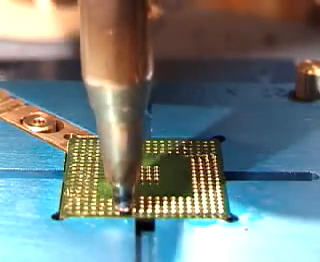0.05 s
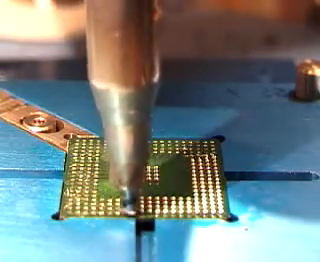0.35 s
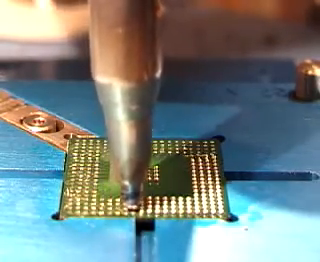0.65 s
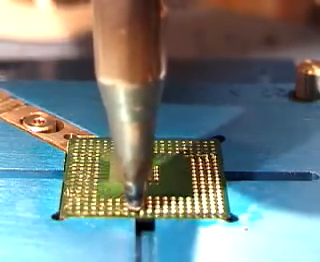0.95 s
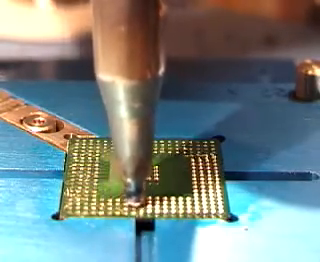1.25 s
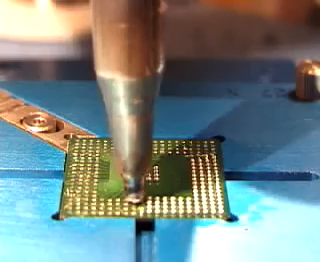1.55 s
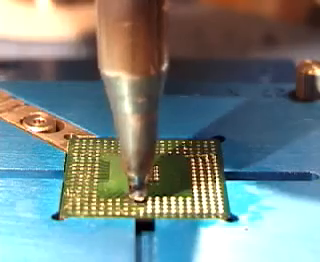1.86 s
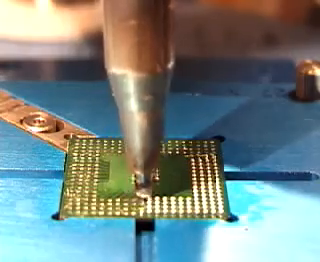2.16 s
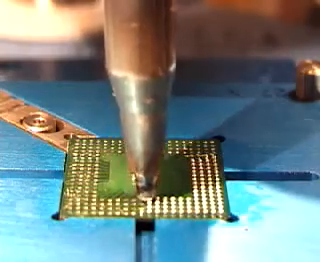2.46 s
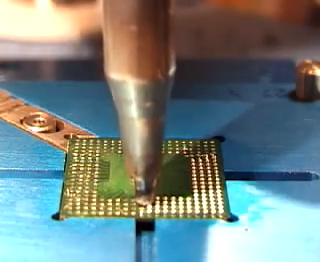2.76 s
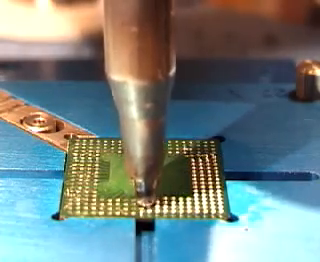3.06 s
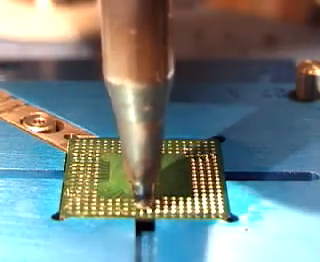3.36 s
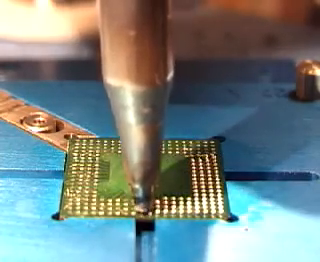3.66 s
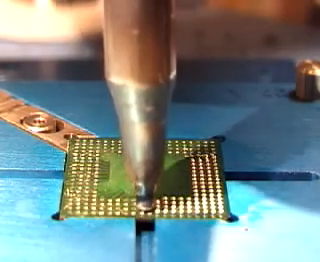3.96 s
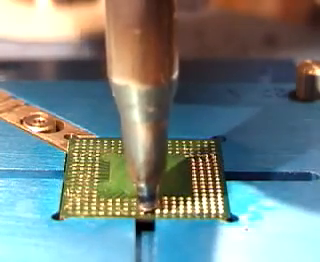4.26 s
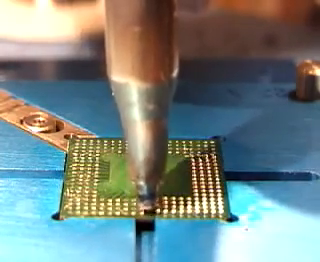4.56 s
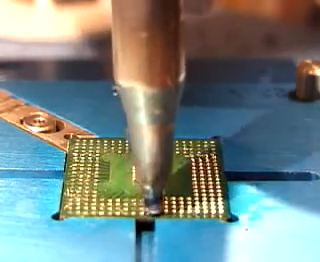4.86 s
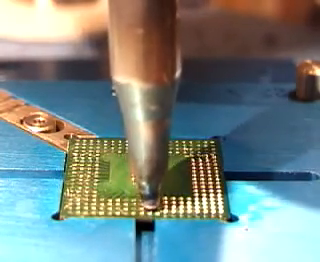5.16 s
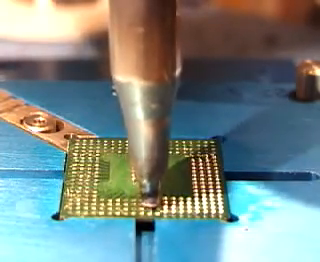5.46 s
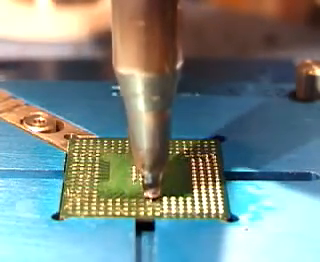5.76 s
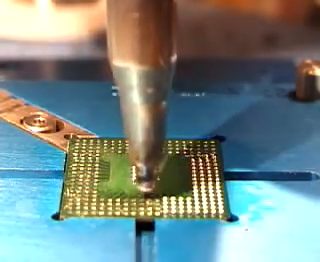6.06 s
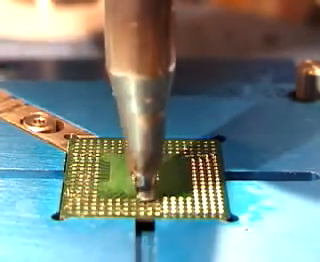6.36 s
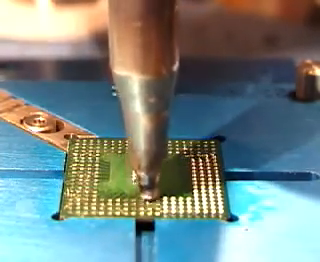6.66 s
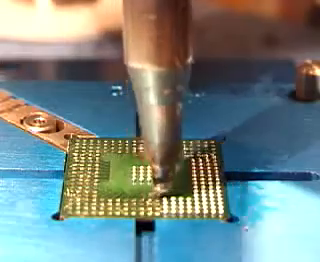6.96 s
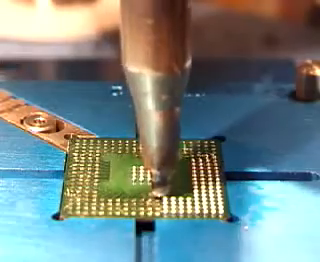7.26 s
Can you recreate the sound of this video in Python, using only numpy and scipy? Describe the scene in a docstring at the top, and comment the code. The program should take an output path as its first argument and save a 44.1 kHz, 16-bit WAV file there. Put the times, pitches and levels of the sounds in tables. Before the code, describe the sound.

Close by on a workbench, a desoldering gun works on a circuit board over the constant buzzing hum of its vacuum pump. A short hiss opens, then a few light ticks and a soft thud from the holder. More ticks and sputtering sips of air follow at uneven intervals as the nozzle lifts and reseals. The hum repeatedly takes on a stronger ringing tone later on, and a longer hiss comes at the end.

```python
"""Desoldering gun and vacuum pump

A mains motor drives a diaphragm 56 times a second. Its two strokes a turn force a harmonic hum from
the housing, while the valves rattle and puff. Whenever the nozzle lifts off the solder, turbulent air
hisses and fizzes in and the hum changes colour. The tip ticks on solder beads; the holder bumps once."""
import sys
import numpy as np
from scipy import signal
from scipy.fft import rfft, irfft, next_fast_len
from scipy.io import wavfile
from scipy.ndimage import map_coordinates

SR = 44100
rng = np.random.default_rng(int(sys.argv[2]) if len(sys.argv) > 2 else 0)


def wav_record(signal):
    """Record a signal, one row per channel, as 16-bit PCM in the file named by sys.argv[1]."""
    frames = np.transpose(np.atleast_2d(signal))
    bounded = np.clip(frames, -1, 1)
    # unit amplitude maps onto the largest positive 16-bit level
    quanta = np.round(bounded * 32767).astype(np.int16)
    wavfile.write(sys.argv[1], SR, quanta)


N = 327222

# Motor speed, sagging as the vacuum deepens. Each row: time in seconds, turns per second.
SPEED = [(0.0, 56.179), (2.6, 56.204), (3.05, 55.973), (3.5, 56.138), (4.4, 56.095), (4.75, 55.846),
         (5.5, 56.164), (5.95, 55.83), (6.2, 56.033), (6.6, 55.876), (6.9, 56.049), (7.42, 55.94)]
# Modes of the pump casing. Each row: frequency in Hz, bandwidth in Hz, gain in dB.
CASING_MODES = [(1458, 19, 1), (1857.3, 38, -0.5), (2019, 26, 3.5), (2574, 43, -6.5), (2945, 35, -1),
                (3870, 166, 0)]
# Modes of the nozzle tube. Each row: frequency in Hz, bandwidth in Hz, gain in dB.
TUBE_MODES = [(5560, 230, -3), (6830, 910, -2.5), (8040, 470, -4), (8800, 430, -4), (10070, 340, -4)]
SEALED_DB = -32  # relative airflow level with the nozzle on the solder


def hum(turns, beat, vented, scatter_hz=2050, waver_db=2.0, hose_orders=(8, 16)):
    """Periodic forcing: opposed strokes about half a turn apart excite harmonics of the shaft speed."""
    # Each row, from the first harmonic up: relative level in dB with the nozzle sealed, then open.
    harmonics = [(-43.5, -43.5), (-37.5, -39), (-26, -27), (-18.5, -19), (-21.5, -22), (-23, -23),
                 (-31.5, -33.5), (-32, -32), (-35, -34), (-37.5, -36), (-35, -39.5), (-27, -28.5),
                 (-33.5, -40), (-33.5, -39), (-37, -36.5), (-44.5, -47), (-31, -32), (-43.5, -48.5),
                 (-39.5, -38), (-39, -48), (-46, -48), (-42.5, -35.5), (-41.5, -39.5), (-43, -40),
                 (-39.5, -34.5), (-35.5, -44), (-58, -41), (-43, -43), (-50, -38), (-36, -60),
                 (-40.5, -33.5), (-34, -31.5), (-29.5, -29), (-35.5, -54), (-43, -46), (-35, -40),
                 (-57, -47), (-47, -47), (-49, -51), (-46, -42), (-48, -47), (-47, -44.5), (-45, -45),
                 (-40, -41), (-44.5, -41), (-37, -54), (-62, -38.5), (-41, -51)]
    # Dull intake against hard exhaust. Each row: frequency in Hz, intake over exhaust in dB.
    stroke_balance = [(335, 1), (480, 8), (800, 5), (1100, -1.5), (1800, -9.5)]
    # Air modes of the pump chamber. Each row: frequency in Hz, bandwidth in Hz, gain in dB.
    chamber_modes = [(311, 66, 0), (673, 26, 1), (953, 20, -2)]
    # Timbre under load. Each row: frequency in Hz, change in dB per turn a second lost.
    strain = [(60, 3), (225, -3.5), (340, -3), (560, -5), (670, -2.5), (740, 16), (850, -2), (950, -0.5),
              (1850, -2)]
    # Modulation by the slip beat. Each row: frequency in Hz, depth in dB.
    throb = [(170, 0.4), (225, 0.62), (280, 0.26), (337, 2.1), (450, 0.5), (670, 0.87), (950, -0.03),
             (1850, 0.3)]
    hose_db = hose(vented)
    speed = curve(SPEED)
    slowing = speed.mean() - speed
    out = np.zeros(N)
    for k, (sealed_db, open_db) in enumerate(harmonics, 1):
        hz = k * speed.mean()
        intake = amp(along(stroke_balance, hz)) * np.exp(-2j * np.pi * k * .186)
        strokes = intake - np.exp(-2j * np.pi * k * .659)
        casing = ringing(hz, CASING_MODES)
        body = ringing(hz, chamber_modes) + casing
        # Short waves arrive by many paths: their phase scatters, except where the casing rings.
        diffuse = min(hz / scatter_hz, 1) ** 2
        scatter = diffuse * max(1 - 2 * abs(casing), 0)
        phase = np.angle(strokes * body) + 1.15 * scatter * rng.standard_normal()
        phase += 0.34 * diffuse * wobble(25)
        db = sealed_db + vented * (open_db - sealed_db) + along(strain, hz) * slowing
        db += along(throb, hz) * beat + waver_db * diffuse * wobble(7)
        if k in hose_orders:
            db += hose_db
        out += amp(db) * np.sqrt(2) * np.cos(2 * np.pi * k * turns + phase)
    return out


def motor(mains_hz=60, start_turn=.12):
    """Induction slip: the rotor lags the mains, and torque beats at twice the difference frequency."""
    turns = start_turn + np.cumsum(curve(SPEED)) / SR
    beat = np.cos(4 * np.pi * (mains_hz * np.arange(N) / SR - turns) + 1.4)
    surge = 0.12 * beat + .05 * wobble(30)  # turns per second
    return turns + np.cumsum(surge) / SR, beat


def hose(vented, rest_db=-3.5, vented_db=-2):
    """Duct resonance: the hose's gain in dB swells as the vacuum shifts; an open nozzle damps it."""
    # Each row: start in seconds, length in seconds, gain in dB.
    swells = [(2.9, .65, 8.5), (4.0, 0.81, 10.5), (4.82, 0.34, 7.5), (5.42, 0.66, 8), (6.1, 0.48, 6.5),
              (6.62, 0.41, 8.5), (7.18, .45, 5)]
    t = np.arange(N) / SR
    arches = sum(db * np.sin(np.pi * np.clip((t - start) / length, 0, 1)) for start, length, db in swells)
    return rest_db + arches + vented_db * vented


def exhaust(turns, puff_db=2.5, sharpness=14):
    """Pulsating jet: air leaves the valve in one puff a turn over a continuous rush."""
    # Each row: frequency in Hz, relative spectral density in dB.
    spectrum = [(30, -17), (90, -9.5), (320, -2), (500, 0), (700, -1), (1150, -5.5), (1800, -3),
                (2700, -4.5), (3400, -7), (4200, -9.5), (5800, -15.5), (11000, -17), (11800, -12),
                (15000, -20.5)]
    puff = np.abs(np.cos(np.pi * (turns - .48))) ** sharpness
    return turbulence(spectrum, amp(puff_db * puff + 0.87 * wobble(25) + wobble(500)))


def rattle(turns, scatter_db=1.5, jitter_s=.0012):
    """Modal excitation: one uneven slap of the valve flap a turn, and rushing air, ring the casing."""
    slaps = np.flatnonzero(np.diff(np.floor(turns - .42)))
    lateness, size = rng.standard_normal((len(slaps), 2)).T
    onsets = np.clip(slaps + (jitter_s * lateness * SR).astype(int), 0, N - 1)
    blows = np.zeros(N)
    blows[onsets] = amp(scatter_db * size)
    drive = unit(blows) + rng.standard_normal(N)
    return unit(filtered(drive, lambda f: ringing(f, CASING_MODES)))


def suction(attack_s=0.031, release_s=0.018, slope_db_per_s=-0.5):
    """Leakage flow, in dB: air rushes in as the nozzle lifts, eases slightly and stops as it reseals."""
    # Each row: start in seconds, length in seconds, relative level in dB.
    leaks = [(-.05, 0.32, -28.5), (.725, 0.036, -24.5), (.825, 0.03, -28.5), (2.137, 0.14, -25.5),
             (2.35, .08, -30.5), (4.12, .04, -27), (4.258, 0.18, -27), (4.44, .28, -26),
             (5.587, 0.023, -29), (5.695, 0.54, -28), (6.8, .65, -27.5), (7.03, .14, -25)]
    t = np.arange(N) / SR
    rise_db = np.zeros(N)
    for start, length, db in leaks:
        age = t - start
        gate = np.clip(age / attack_s, 0, 1) * np.clip(1 - (age - length) / release_s, 0, 1)
        hold_db = db - SEALED_DB + slope_db_per_s * (age - length / 2)
        rise_db = np.maximum(rise_db, gate * hold_db)
    return SEALED_DB + rise_db


def venting(air_db, threshold_db=-30, lag_s=0.035):
    """Pressure relaxation: a first-order lag between nozzle sealed (0) and open (1)."""
    is_open = (air_db > threshold_db).astype(float)
    pole = np.exp(-1 / (lag_s * SR))
    return is_open[0] + signal.lfilter([1 - pole], [1, -pole], is_open - is_open[0])


def nozzle(turns, air_db, silent_db=-33, sputter_db=2.5, pulse_db=-1.5):
    """Flow noise: air drawn past the tip hisses, pulsing with the pump and sputtering on the solder."""
    # Each row: frequency in Hz, relative spectral density in dB.
    spectrum = [(400, -6), (2200, -0.5), (3300, -6), (5400, -3.5), (9500, -5), (11000, -3.5), (11900, 2.5),
                (14500, -3), (15800, -10)]
    flow = np.sqrt(np.maximum(amp(air_db) ** 2 - amp(silent_db) ** 2, 0))
    flutter_db = sputter_db * wobble(350) + pulse_db * np.cos(2 * np.pi * turns)
    return flow * turbulence(spectrum, amp(flutter_db))


def fizz(air_db, sputter_db=3.6, flicker_db=3.0, growth=0.79):
    """Intermittent flow: air bubbles past molten solder in spurts that grow with the suction."""
    # Each row: frequency in Hz, relative spectral density in dB.
    spectrum = [(8000, -36), (11000, -17), (11700, 2), (13500, -2), (15000, -4), (15900, -13)]
    level_db = SEALED_DB + growth * (air_db - SEALED_DB)
    flutter_db = sputter_db * wobble(400) + flicker_db * wobble(90)
    return amp(level_db) * turbulence(spectrum, amp(flutter_db))


def ticks(t60_s=0.012, relative_width=0.94, knock_db=0.5, board_hz=990, tube_db=-6):
    """Impact noise: the tip cracks against a solder bead, knocks the board and rings the nozzle tube."""
    # Each row: start in seconds, relative peak level in dB, centre frequency in Hz.
    contacts = [(.7415, -11, 5500), (0.7542, -9.5, 2800), (.76, -15, 1500), (.841, -17, 8000),
                (2.162, -11.5, 5400), (2.289, -8, 13000), (4.125, -15, 5000), (4.303, -8.5, 2600),
                (4.317, -10, 4200), (4.4455, -5, 4000), (4.451, -12, 5400), (4.482, -13, 2200),
                (4.494, -12, 2800), (5.601, -10.5, 2900), (5.604, -4.5, 2200), (5.7385, -17, 5500),
                (5.741, -6.5, 2200), (5.752, -8, 2900), (5.786, -13, 2400)]
    t = np.arange(SR // 20) / SR
    f = np.fft.rfftfreq(len(t), 1 / SR)
    knock = amp(knock_db) * resonance(f, board_hz, board_hz) ** 2
    tube = 1 + amp(tube_db) * ringing(f, TUBE_MODES)
    out = np.zeros(N + len(t))
    for start, db, hz in contacts:
        burst = rng.standard_normal(len(t)) * amp(-60 * t / t60_s)
        body = resonance(f, hz, relative_width * hz) ** 2 + knock
        crack = irfft(rfft(burst) * body * tube, len(t))
        out[round(start * SR):][:len(t)] += amp(db) * crack / np.abs(crack).max()
    return out[:N]


def bump(start_s=.787, db=-27, hz=126, t60_s=.33, attack_s=.005):
    """Damped oscillation: the holder booms briefly on the bench."""
    t = np.maximum(np.arange(N) / SR - start_s, 0)
    return amp(db - 60 * t / t60_s) * (1 - np.exp(-t / attack_s)) * np.sin(2 * np.pi * hz * t)


def turbulence(spectrum, flutter):
    """Partly coherent stereo noise of rms 1, modulated by flutter and coloured by the tube's modes."""
    # Each row: frequency in Hz, correlation of left and right.
    coherence = [(60, .7), (200, .95), (1400, .93), (3100, .82), (5000, .55), (7500, .3), (10000, .6),
                 (12000, .96)]

    def response(f):
        angle = np.arccos(np.clip(along(coherence, f), -1, 1)) / 2
        colour = amp(along(spectrum, f)) * (1 + ringing(f, TUBE_MODES))
        return colour * [np.cos(angle), np.sin(angle)]

    mid, side = filtered(flutter * rng.standard_normal((2, N)), response)
    return unit(np.array([mid + side, mid - side]))


def resonance(f, hz, width):
    """Band-pass response of a damped oscillator."""
    return 1j * f * width / (hz * hz - f * f + 1j * f * width)


def ringing(f, modes):
    """Modal superposition: a body responds as the sum of its modes."""
    return sum(amp(db) * resonance(f, hz, width) for hz, width, db in modes)


def filtered(x, response):
    """Linear filtering: the spectrum of x times a complex frequency response."""
    size = next_fast_len(N + SR // 2)
    return irfft(rfft(x, size) * response(np.fft.rfftfreq(size, 1 / SR)), size)[..., :N]


def wobble(rate):
    """A smooth random curve with rate knots a second."""
    steps = np.arange(0, N + 64, 64)
    knots = rng.standard_normal(int(N * rate / SR) + 4)
    return np.interp(np.arange(N), steps, map_coordinates(knots, [steps * rate / SR]))


def along(points, hz):
    """(Hz, value) rows interpolated on a log axis."""
    f, values = np.transpose(points)
    return np.interp(np.log(hz + 1), np.log(f + 1), values)


def curve(rows):
    """(seconds, value) rows interpolated at every sample."""
    return np.interp(np.arange(N) / SR, *np.transpose(rows))


def amp(db):
    """Decibels to gain."""
    return 10 ** (np.asarray(db) / 20)


def unit(x):
    """x scaled to rms 1."""
    return x / np.sqrt(np.mean(x ** 2) + 1e-20)


def scene():
    """Superposition: pump and gun reach two nearby points with differences of level and phase."""
    # Each row: frequency in Hz, left minus right level in dB.
    lean = [(60, 4.5), (110, 4), (200, 1), (380, 1.5), (700, 0), (1290, 1.7), (2400, 1), (4400, 2),
            (8000, 1), (13000, .2)]
    # Each row: frequency in Hz, phase lead of the left in radians.
    lead = [(60, 0.97), (220, 0.32), (700, .25), (1300, 0.42), (2400, .25), (8000, 0.94), (12000, 0)]
    turns, beat = motor()
    air_db = suction()
    pump = amp(-1.4) * hum(turns, beat, venting(air_db)) + amp(-34) * rattle(turns)
    pump = pump + amp(-28) * exhaust(turns)
    gun = amp(-0.9) * nozzle(turns, air_db) + amp(-7) * fizz(air_db)
    gun += amp(-1.5) * ticks() + bump()
    sides = np.array([[.5], [-.5]])
    return filtered(pump + gun, lambda f: amp(sides * along(lean, f)) * np.exp(1j * sides * along(lead, f)))


def record(dry):
    """Band limiting: an ideal low-pass removes everything above 15.9 kHz."""
    return filtered(dry, lambda f: f < 15900)


dry = scene()
out = record(dry)
wav_record(out)
```